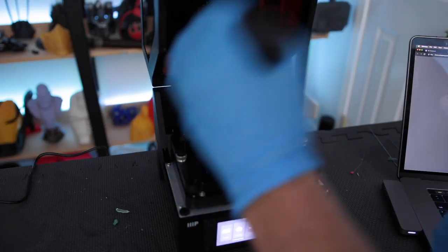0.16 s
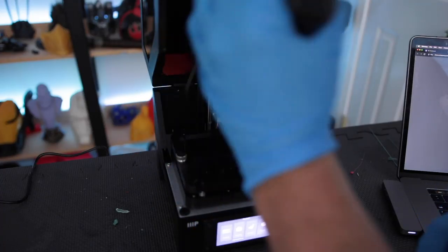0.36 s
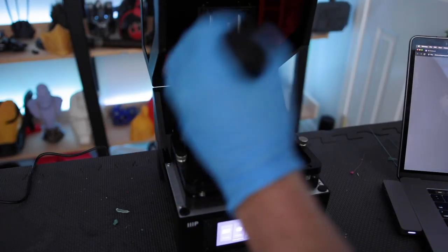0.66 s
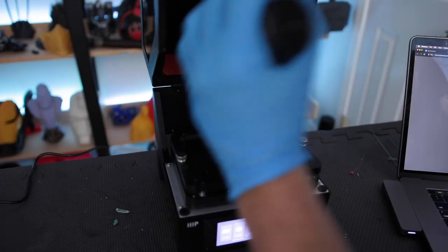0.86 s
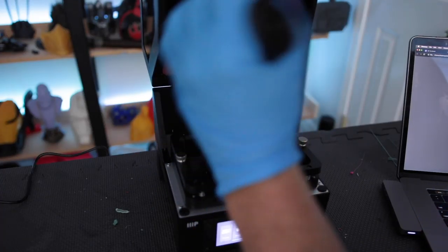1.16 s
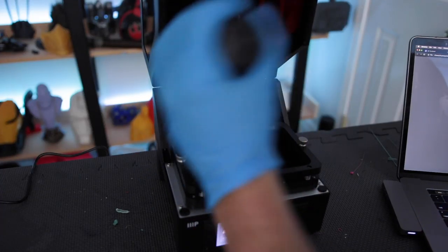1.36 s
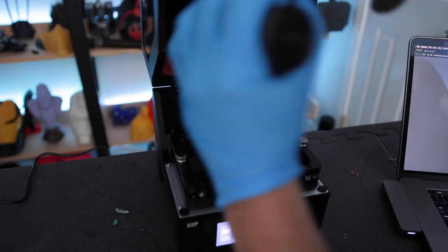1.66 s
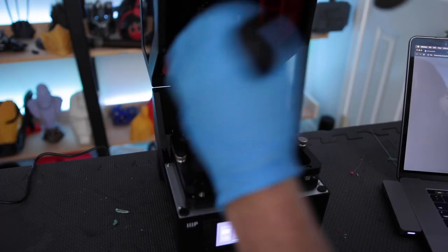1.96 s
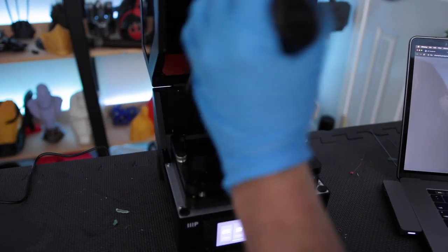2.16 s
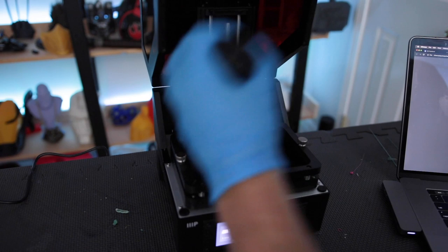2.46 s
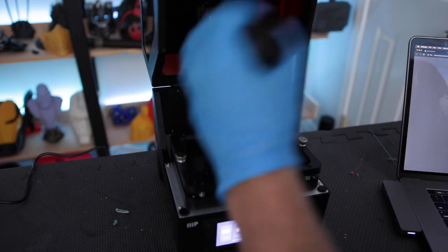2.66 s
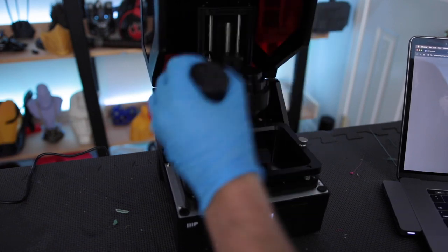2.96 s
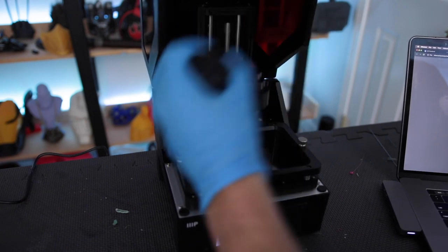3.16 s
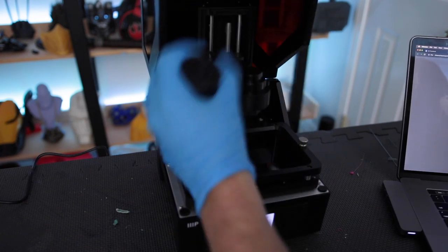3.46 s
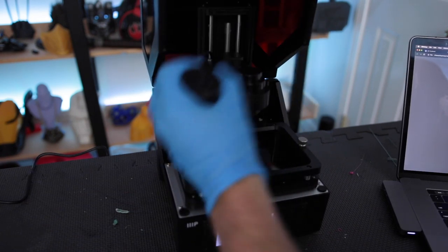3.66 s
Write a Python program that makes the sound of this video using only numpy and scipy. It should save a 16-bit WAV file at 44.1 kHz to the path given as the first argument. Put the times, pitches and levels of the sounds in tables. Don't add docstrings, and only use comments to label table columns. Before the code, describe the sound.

A small plastic bottle of liquid is shaken hard by hand, slapping and glugging close up

```python
import sys
import numpy as np
from scipy import signal
from scipy.fft import rfft, irfft
from scipy.io import wavfile

SR = 44100
rng = np.random.default_rng(int(sys.argv[2]) if len(sys.argv) > 2 else 0)


def generate_wav(signal):
    frames = np.transpose(np.atleast_2d(signal))
    scaled = np.clip(frames, -1, 1) * 32767
    pcm = np.round(scaled).astype(np.int16)
    wavfile.write(sys.argv[1], SR, pcm)


def to_linear_factor(level_db):
    exponent = np.asarray(level_db, float) / 20
    return 10 ** exponent


N = 167580

# pitch_hz [Hz], level_db [dB per Hz]
AIR_SPECTRUM = [(15, -31), (25, 5.5), (175, 9), (607, 2.5), (775, -31), (1840, -17), (3430, -5.5),
                (16000, -18.5)]
# pitch_hz [Hz], level_db [dB per Hz]
HISS_SPECTRUM = [(15, -28), (25, 6), (840, -5.5), (3340, -18.5), (4370, -7.5), (16000, 1)]
# start_s [s], level_db [dB peak], pitch_hz [Hz], foam_db [dB re peak]
EARLY_POPS = [(0.001, -48.5, 3250, 0.5), (0.0371, -41.5, 2800, -1.5), (0.098, -41, 2800, -9),
              (0.3051, -31.5, 2660, -19.5), (0.3934, -20, 3380, -31), (0.4514, -24, 3520, -13.5),
              (0.5147, -36, 3600, -15), (0.5376, -20, 3570, -23), (0.6054, -29, 2640, -23),
              (0.6212, -30, 2570, -23), (0.6832, -37.5, 2950, -9.5), (0.7794, -39, 4220, -15.5),
              (0.8292, -24.5, 4200, -16), (0.8603, -19.5, 2780, -19), (0.9493, -33.5, 3300, -14),
              (0.9917, -40.5, 2900, -0.5), (1.0118, -11.5, 4900, -27.5), (1.1812, -37.5, 3270, -14),
              (1.2087, -23, 2970, -24.5), (1.3389, -28, 4100, -16.5), (1.3531, -21.5, 3660, -24),
              (1.457, -32.5, 3770, -21.5), (1.5, -34, 4080, -19.5), (1.5141, -23.5, 3180, -22),
              (1.6556, -23.5, 3420, -25)]
# start_s [s], level_db [dB peak], pitch_hz [Hz], foam_db [dB re peak]
LATE_POPS = [(1.7463, -13, 2680, -19), (1.7741, -14.5, 2560, -27), (1.8063, -25.5, 4400, -11),
             (1.8231, -12, 3490, -21.5), (1.8562, -21.5, 3830, -42), (1.921, -20.5, 3180, -52),
             (1.9856, -44.5, 2300, -7), (2.171, -9, 3390, -27.5), (2.2573, -28.5, 2330, -29),
             (2.339, -20, 3890, -15), (2.5129, -12.5, 3180, -21), (2.6082, -24.5, 4100, -10),
             (2.785, -35.5, 3300, -19.5), (2.8675, -45, 3040, 2), (2.9572, -21, 2370, -24),
             (2.9883, -30, 2380, -19), (3.0434, -24, 2610, -20), (3.1348, -33.5, 3470, -21),
             (3.1682, -25, 3380, -33), (3.2165, -15, 3470, -21), (3.3867, -17, 3460, -20),
             (3.496, -32.5, 3800, -16), (3.5213, -31, 3060, -12), (3.5633, -25, 3980, -12.5),
             (3.6532, -32.5, 3400, -6)]
# start_s [s], level_db [dB peak], pitch_hz [Hz]
WALL_KNOCKS = [(0.0014, -40.5, 1300), (0.266, -27.5, 1955), (0.318, -39.5, 1520), (0.4531, -31.5, 1460),
               (0.5354, -31, 1654), (0.6708, -35, 1580), (0.8256, -36.5, 1440), (1.0037, -27.5, 2050),
               (1.309, -46, 1026), (1.3602, -32.5, 1534), (1.4611, -36.5, 1340), (1.8065, -27, 997),
               (1.8234, -26, 2050), (2.1123, -45.5, 1140), (2.165, -33, 910), (2.168, -20.5, 1554),
               (2.5122, -25, 1540), (2.684, -46, 1660), (2.7842, -40.5, 1240), (2.8651, -31.5, 1546),
               (2.9571, -28.5, 1970), (3.0462, -22, 1545), (3.1916, -45.5, 1400), (3.216, -22, 1733),
               (3.3214, -37.5, 1054), (3.386, -24.5, 1152), (3.577, -37, 1290), (3.6621, -39, 2110)]
# pitch_hz [Hz], level_db [dB]
STANDING_WAVES = [(152, -57), (266, -54), (309, -55), (355, -55), (427, -56), (553, -59)]
# pitch_hz [Hz], t60_s [s], level_db [dB]
REVERB_BANDS = [(830, 0.36, 3), (1650, 0.49, 1.5), (3500, 0.55, -0.5), (6940, 0.5, -0.5), (12900, 1, -2)]
# start_s [s], level_db [dB peak], spray_db [dB re peak]
DROP_TICKS = [(0.0398, -39.5, -14.5), (0.452, -35.5, -20.5), (0.536, -32.5, -20), (0.8278, -40.5, -15),
              (0.8632, -31.5, -35), (0.948, -41.5, -16), (0.9902, -42, -10.5), (1.0128, -22, -34),
              (1.3387, -37.5, -18.5), (1.7452, -31, -10.5), (1.8105, -40, -19), (1.8234, -26, -26),
              (1.987, -37.5, -14.5), (2.171, -28.5, -20), (2.257, -49.5, -5), (2.341, -33.5, -22),
              (2.5105, -37.5, -12.5), (2.61, -27, -22), (2.8678, -43, -13), (3.1358, -37.5, -21),
              (3.2202, -20, -25), (3.386, -41.5, -10.5), (3.5199, -38, -22), (3.56, -26.5, -22),
              (3.6498, -37.5, -13)]
# start_s [s], level_db [dB peak], pitch_hz [Hz]
AIR_GLUGS = [(0.041, -54, 627), (0.197, -45.5, 650), (0.449, -44.5, 604), (0.538, -30.5, 408),
             (0.697, -38, 423), (0.857, -46, 359), (0.993, -37, 708), (1.181, -38.5, 397),
             (1.338, -36.5, 370), (1.499, -35.5, 375), (1.75, -39.5, 567), (1.986, -49.5, 409),
             (2.166, -41.5, 388), (2.339, -30.5, 451), (2.512, -41, 420), (2.604, -39.5, 557),
             (2.864, -43, 686), (3.043, -39.5, 593), (3.217, -38, 374), (3.488, -38, 333),
             (3.561, -32.5, 495), (3.662, -41.5, 584)]
# start_s [s], level_db [dB peak], pitch_hz [Hz]
LATE_BURPS = [(0.149, -49, 860), (0.203, -38, 623), (0.212, -48, 756), (0.556, -33.5, 480),
              (0.58, -40.5, 336), (0.594, -36, 362), (0.675, -45, 600), (0.714, -33.5, 304),
              (0.726, -38.5, 755), (0.865, -37.5, 570), (0.886, -49.5, 325), (0.906, -57, 334),
              (0.999, -34, 830), (1.006, -37, 750), (1.196, -49, 412), (1.209, -39, 315),
              (1.236, -46.5, 356), (1.311, -44, 850), (1.351, -36, 342), (1.519, -40, 363),
              (1.544, -39.5, 398), (1.737, -40, 537), (2.356, -33.5, 486), (2.365, -33.5, 386),
              (2.619, -37, 640), (2.873, -37.5, 680), (3.388, -33, 480), (3.512, -37.5, 350),
              (3.574, -33.5, 550), (3.649, -40.5, 491), (3.671, -31.5, 680), (3.682, -35.5, 720)]
# start_s [s], level_db [dB peak], pitch_hz [Hz]
LONE_BUBBLES = [(0.197, -37.5, 2860), (0.217, -41, 2530), (0.236, -40.5, 4100), (0.717, -35, 4200),
                (1.098, -42, 2960), (1.104, -36.5, 2480), (1.187, -32, 3400), (1.2349, -30, 3770),
                (1.5198, -35.5, 1060), (2.0541, -49, 3150), (2.0782, -43.5, 3640), (2.1385, -40, 1890),
                (2.151, -36, 3040), (2.3445, -20.5, 2450), (2.3634, -34, 3560), (2.37, -28.5, 2680),
                (2.5308, -24.5, 1950), (2.6126, -22.5, 2670), (2.7277, -46, 2600), (2.7725, -47, 2680),
                (2.8741, -27.5, 1580), (3.0738, -31.5, 1040), (3.3954, -26.5, 1180), (3.403, -22.5, 1970),
                (1.7592, -23, 2300), (1.83, -27, 2100), (1.8097, -23, 1520)]
# start_s [s], level_db [dB peak]
CAP_CREAKS = [(0.513, -41.5), (0.6733, -46), (0.698, -40), (0.7813, -42.5), (1.1817, -40), (1.3074, -53.5),
              (1.499, -35), (1.6545, -45), (2.4309, -44), (2.449, -47), (2.4583, -38.5), (2.5981, -46),
              (2.7781, -63), (2.8794, -54), (2.9143, -45.5), (3.027, -44), (3.0445, -38.5), (3.0524, -44),
              (3.306, -39.5), (3.487, -45)]
# start_s [s], level_db [dB peak]
HAND_THUDS = [
    (4, -40),
    (0.81, -37),
    (2.332, -33.5),
]

FOAM_T60_S, FOAM_OCTAVES, FOAM_CYCLES = 0.42, 0.71, 4.04
BUBBLE_GLIDE, POCKET_GLIDE = 1.064, 0.991


def ring(pitch_hz, cycles, rise, glide):
    cycle = np.arange(int(SR / pitch_hz * (6 * cycles + 4))) * pitch_hz / SR
    envelope = (1 - np.exp(-(cycle / rise) ** 2)) * np.exp(-cycle / cycles)
    slide = 1 + (glide - 1) * cycle / (4 * cycles)
    y = envelope * np.sin(2 * np.pi * cycle * slide)
    return y / np.abs(y).max()


def add(out, start_s, sound):
    first = max(int(start_s * SR), 0)
    out[first:first + len(sound)] += sound[:max(N - first, 0)]


def swarm(level_db, pitch_hz, octaves, t60_s, cycles, count):
    late_s = min(t60_s, 0.5) * 0.47 * rng.random((count, 1)) ** 1.9
    spread = 2 ** (octaves * (2 * rng.random((count, 1)) - 1))
    hz = np.minimum(pitch_hz * spread, 15000)
    scatter_db = 3 * rng.standard_normal((count, 1)).clip(-2, 1.5)
    gain = to_linear_factor(level_db - 60 * late_s / t60_s + scatter_db) * (pitch_hz / hz) ** 0.4
    n = np.arange(int(SR / hz.min() * (4 * cycles + 2)))
    cycle = n * hz / SR
    envelope = (1 - np.exp(-cycle ** 2)) * np.exp(-cycle / cycles)
    grains = gain * envelope * np.sin(2 * np.pi * cycle * (1 + 0.01994 * cycle))
    return np.bincount(((late_s * SR).astype(int) + n).ravel(), grains.ravel())


def coloured_noise(spectrum, level_db):
    point_hz, point_db = np.transpose(spectrum)
    hz = np.fft.rfftfreq(N, 1 / SR) + 1
    shape_db = np.interp(np.log(hz), np.log(point_hz), point_db)
    y = irfft(rfft(rng.standard_normal(N)) * to_linear_factor(shape_db), N)
    return y * to_linear_factor(level_db) / y.std()


def room_air():
    return coloured_noise(AIR_SPECTRUM, -63)


def microphone_hiss():
    return coloured_noise(HISS_SPECTRUM, -73.5)


def bubble_pops():
    out = np.zeros(N)
    for start_s, level_db, pitch_hz, foam_db in list(EARLY_POPS) + list(LATE_POPS):
        pop = ring(pitch_hz, cycles=2.6, rise=0.5, glide=BUBBLE_GLIDE)
        add(out, start_s, to_linear_factor(level_db - 2) * pop)
        add(out, start_s, swarm(level_db - 13, pitch_hz, FOAM_OCTAVES, 0.1, FOAM_CYCLES, count=9))
        foam_hz = pitch_hz * (4100 / pitch_hz) ** 0.42
        foam = swarm(level_db + foam_db - 4.5, foam_hz, FOAM_OCTAVES, FOAM_T60_S, FOAM_CYCLES, count=500)
        add(out, start_s, foam)
    return out


def wall_knocks():
    out = np.zeros(N)
    for start_s, level_db, pitch_hz in WALL_KNOCKS:
        add(out, start_s, to_linear_factor(level_db + 6) * ring(pitch_hz, cycles=1.9, rise=0.5, glide=0.99))
        foam = swarm(level_db - 16.5, pitch_hz, FOAM_OCTAVES, FOAM_T60_S, FOAM_CYCLES, count=120)
        add(out, start_s, foam)
    return out


def room(dry_sound):
    t = np.arange(SR // 2) / SR
    onset = np.clip(t / 0.0036 - 1, 0, 1)
    grain_db = -8 * np.log(rng.random(len(t))) * np.exp(-t / 0.012)
    echoes = rng.standard_normal(len(t)) * to_linear_factor(grain_db) * onset
    tail = np.zeros(len(t))
    for pitch_hz, level_db in STANDING_WAVES:
        fade = to_linear_factor(level_db - 60 * t / 0.2)
        tail += fade * np.sin(2 * np.pi * (pitch_hz * t + rng.random())) * onset
    for pitch_hz, t60_s, level_db in REVERB_BANDS:
        edges_hz = [pitch_hz / 2 ** 0.5, pitch_hz * 2 ** 0.5]
        octave = signal.butter(2, edges_hz, "band", fs=SR, output="sos")
        band = signal.sosfilt(octave, echoes) * to_linear_factor(-60 * t / t60_s)
        tail += band * to_linear_factor(level_db) * np.sqrt(0.49 * pitch_hz / SR / np.sum(band ** 2))
    return signal.fftconvolve(dry_sound, tail)[:N]


def drips():
    out = np.zeros(N)
    for when, pitch, size in rng.random((700, 3)):
        pitch_hz = 1500 * 3 ** (2 * pitch - 1)
        drip = ring(pitch_hz, cycles=5.6, rise=0.4, glide=1.06)
        add(out, when * N / SR, to_linear_factor(-62 + 11 * size ** 2) * drip)
    return out


def drop_ticks():
    out = np.zeros(N)
    for start_s, level_db, spray_db in DROP_TICKS:
        add(out, start_s, to_linear_factor(level_db + 3) * ring(6000, cycles=0.76, rise=0.51, glide=1))
        spray = swarm(level_db + spray_db + 21, 6800, octaves=0.68, t60_s=0.18, cycles=0.48, count=400)
        add(out, start_s, spray)
    return out


def air_glugs():
    out = np.zeros(N)
    for start_s, level_db, pitch_hz in AIR_GLUGS:
        glug = ring(pitch_hz, cycles=1.3, rise=0.39, glide=POCKET_GLIDE)
        add(out, start_s, to_linear_factor(level_db + 11.5) * glug)
        gurgle_db = level_db - 16.5 + 15 * np.log2(pitch_hz / 380)
        gurgle = swarm(gurgle_db, 0.706 * pitch_hz, octaves=0.7, t60_s=0.26, cycles=4.2, count=18)
        add(out, start_s, gurgle)
    return out


def late_burps():
    out = np.zeros(N)
    for start_s, level_db, pitch_hz in LATE_BURPS:
        burp = ring(pitch_hz, cycles=1.81, rise=0.46, glide=POCKET_GLIDE)
        add(out, start_s, to_linear_factor(level_db + 2) * burp)
    return out


def lone_bubbles():
    out = np.zeros(N)
    for start_s, level_db, pitch_hz in LONE_BUBBLES:
        plip = ring(pitch_hz, cycles=2.2, rise=0.5, glide=BUBBLE_GLIDE)
        add(out, start_s, to_linear_factor(level_db - 0.5) * plip)
    return out


def cap_creaks():
    out = np.zeros(N)
    for start_s, level_db in CAP_CREAKS:
        add(out, start_s, swarm(level_db + 9, 4930, octaves=1.38, t60_s=0.04, cycles=0.95, count=24))
    return out


def hand_thuds():
    out = np.zeros(N)
    for start_s, level_db in HAND_THUDS:
        add(out, start_s, to_linear_factor(level_db) * ring(147, cycles=0.71, rise=0.14, glide=1))
    return out


def through_plastic(inside):
    muffle = signal.butter(8, 4960, fs=SR, output="sos")
    bass_cut = signal.butter(2, 139, "high", fs=SR, output="sos")
    return signal.sosfilt(bass_cut, signal.sosfilt(muffle, inside))


def scene():
    inside = bubble_pops() + wall_knocks() + air_glugs() + late_burps() + lone_bubbles() + hand_thuds()
    bottle = through_plastic(inside) + drips() + drop_ticks() + cap_creaks()
    mid = bottle + room(bottle) + room_air()
    side = microphone_hiss()
    return np.array([mid + side, mid - side])


def band_limit(x):
    return signal.sosfilt(signal.butter(12, 16500, fs=SR, output="sos"), x)


def record(dry):
    top_cut = signal.ellip(8, 0.2, 60, 16000, fs=SR, output="sos")
    mix = signal.sosfilt(top_cut, dry)
    return band_limit(mix)


dry = scene()
out = record(dry)
generate_wav(out)
```